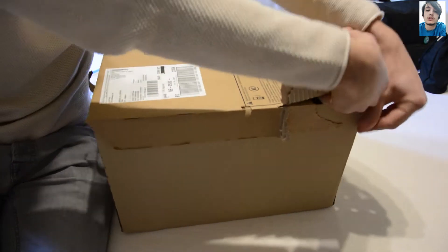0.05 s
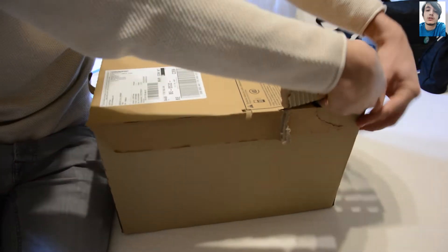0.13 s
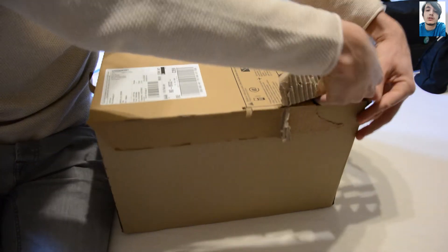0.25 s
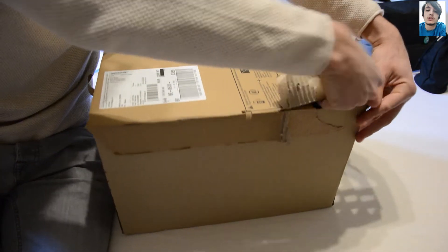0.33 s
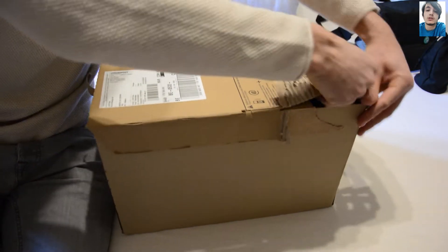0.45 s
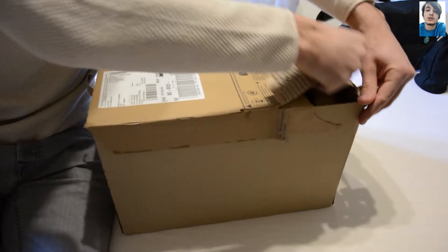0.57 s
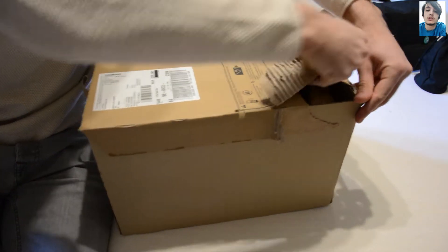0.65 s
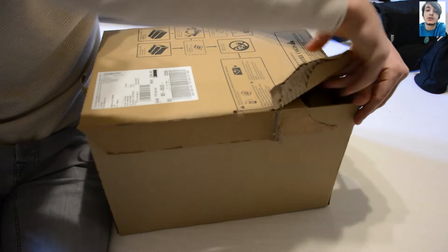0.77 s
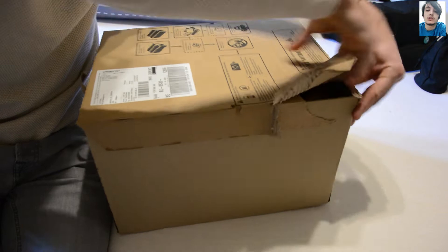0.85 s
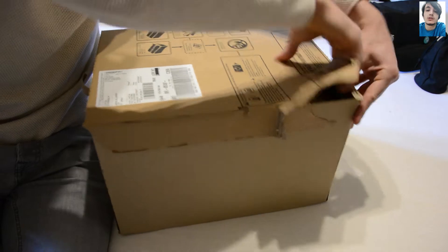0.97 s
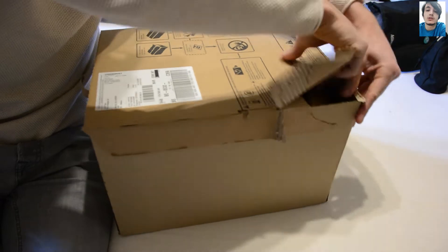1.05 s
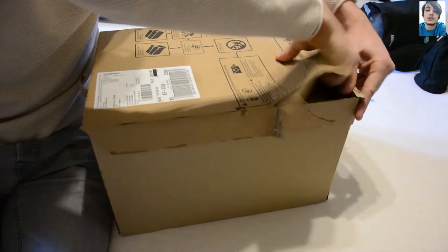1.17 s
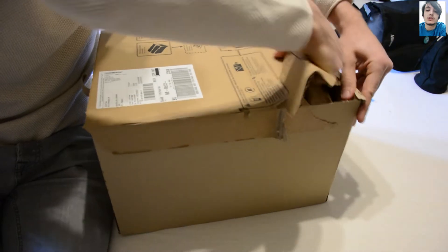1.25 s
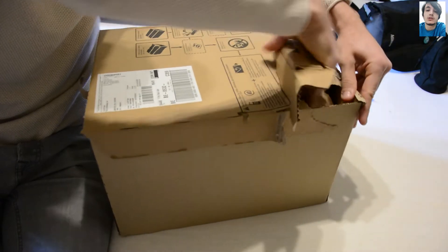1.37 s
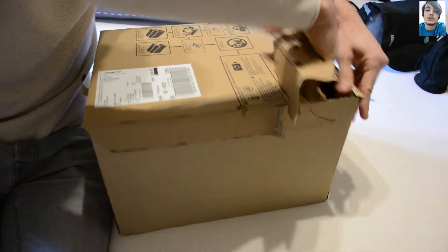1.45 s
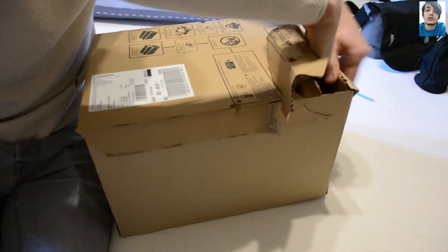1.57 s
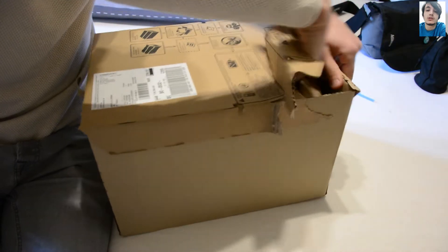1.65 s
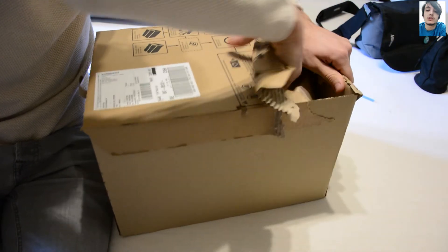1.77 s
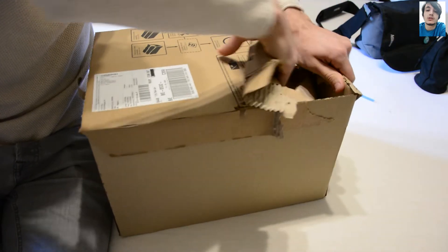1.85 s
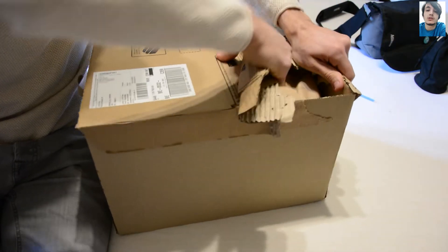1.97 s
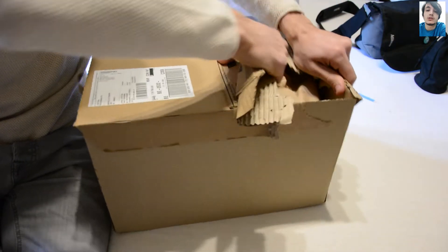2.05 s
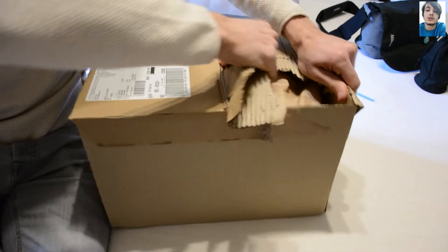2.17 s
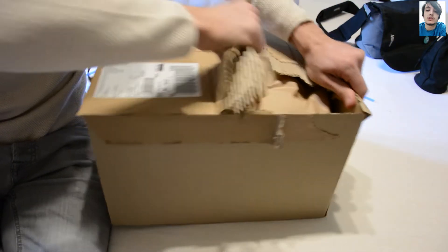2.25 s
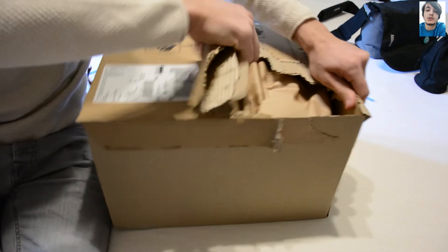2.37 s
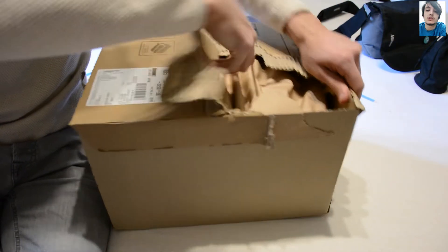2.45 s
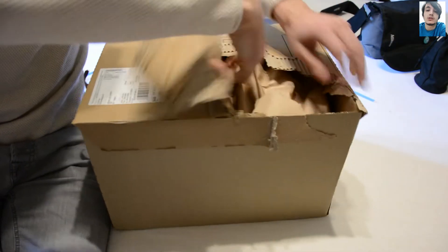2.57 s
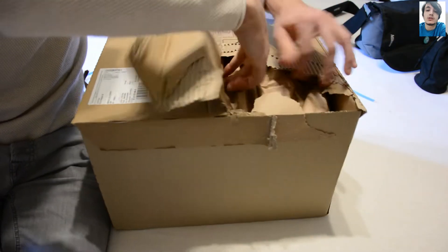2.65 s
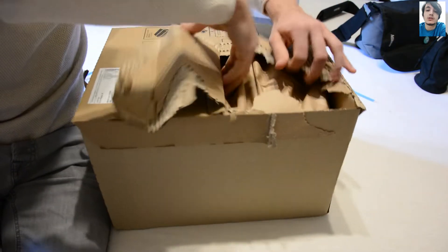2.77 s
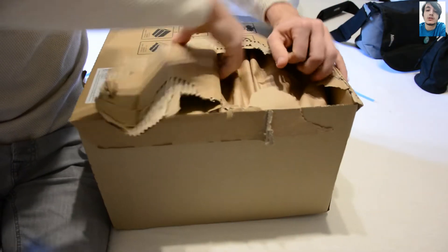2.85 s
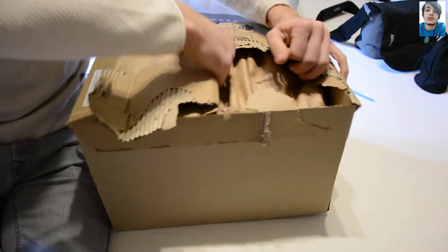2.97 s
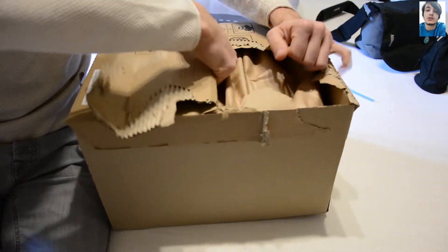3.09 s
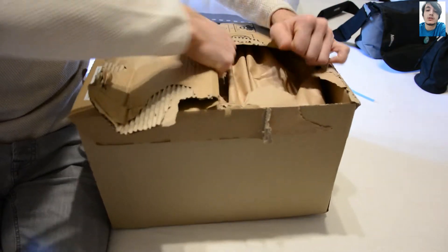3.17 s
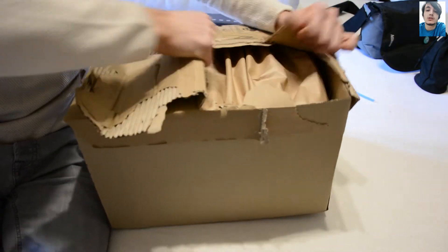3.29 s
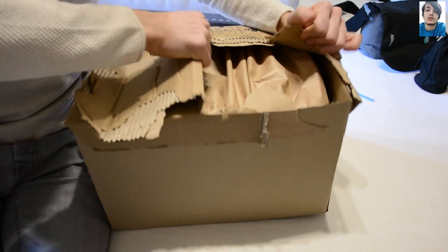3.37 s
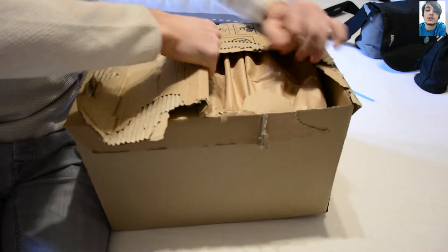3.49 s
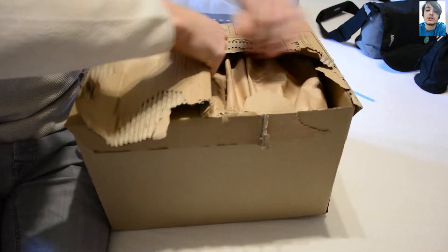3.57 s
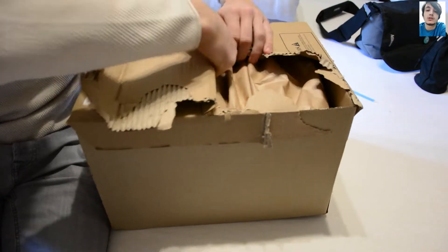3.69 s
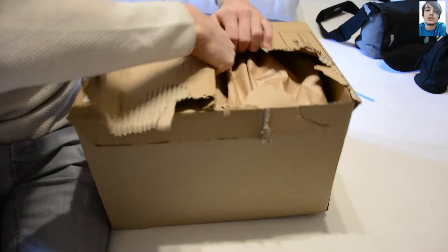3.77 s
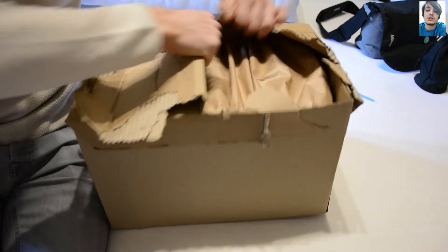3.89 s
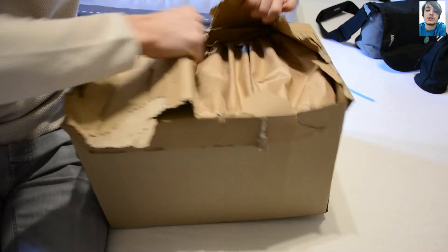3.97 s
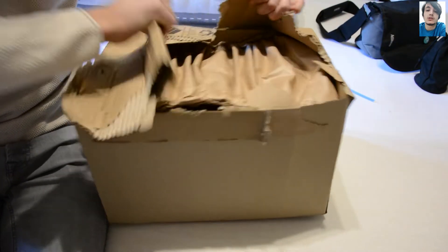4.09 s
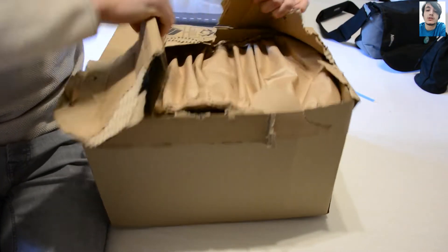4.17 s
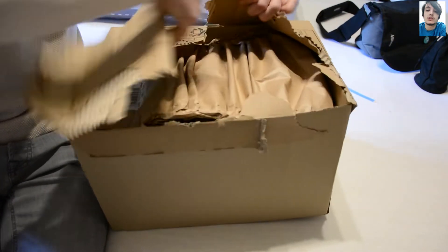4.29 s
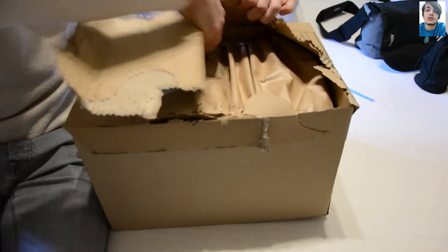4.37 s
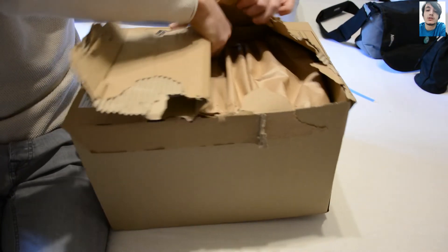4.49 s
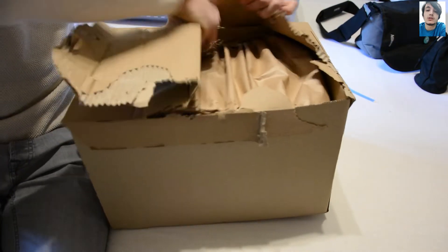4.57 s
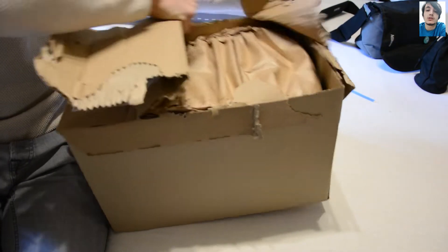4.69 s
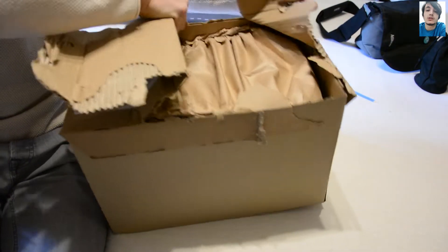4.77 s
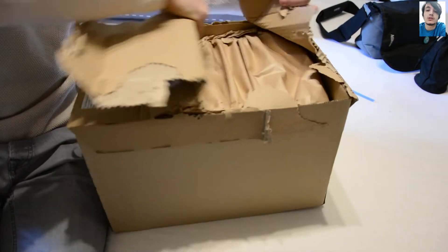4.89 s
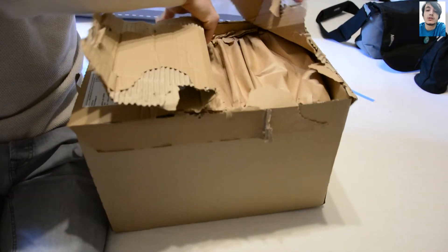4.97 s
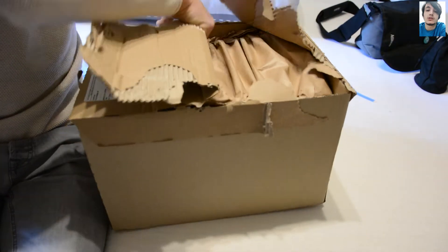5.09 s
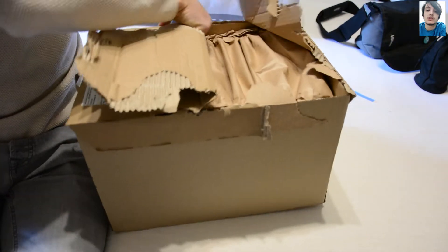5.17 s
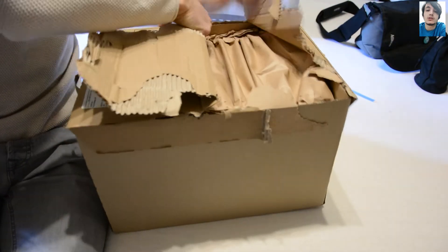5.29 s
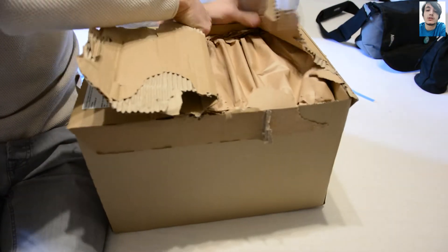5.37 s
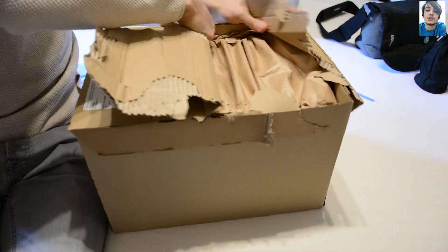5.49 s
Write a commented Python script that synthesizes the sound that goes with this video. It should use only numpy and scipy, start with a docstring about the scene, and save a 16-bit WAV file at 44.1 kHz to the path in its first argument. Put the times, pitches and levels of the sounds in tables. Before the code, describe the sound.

Hands tear open a corrugated cardboard box, heard close up in a small room with a short echo and a faint low rumble. For the first second there are only light crackles, scrapes and small snaps. A first real rip comes from about 1.1 to 1.4 seconds, dry and rasping, with hollow knocks from the box walls. After some softer crackling, a louder tear runs from 2.0 to 2.3 seconds and ends with a thump. Quieter picking and ticking follow, then a quick run of sharp snaps and ripping at 3.1 to 3.4 seconds. A crack at 3.8 leads into the loudest rip and a hollow thump around 4.0 to 4.2 seconds. The hardest peaks distort slightly. A shorter, lower crunch comes at 4.6 seconds, and soft crackling with small bumps continues until about 5.6 seconds.

```python
"""Ripping open a cardboard box

Hands tear open a corrugated cardboard box on a table in a small room. Fibres break in dense bursts,
and the glued flutes (the wavy ridges inside the board) let go with single snaps.
The hollow box booms and thumps. The loudest rips overload the recorder."""
import sys
import numpy as np
from scipy import signal
from scipy.fft import rfft, irfft, next_fast_len
from scipy.io import wavfile
from scipy.ndimage import map_coordinates

SR = 44100
rng = np.random.default_rng(int(sys.argv[2]) if len(sys.argv) > 2 else 0)


def log_audio(samples):
    """Write samples as a 16-bit WAV file to the path given in sys.argv[1]."""
    # one column per channel
    frames = np.atleast_2d(samples).T
    # limit to full scale, then quantise
    limited = np.clip(frames, -1, 1)
    pcm = np.round(limited * 32767).astype(np.int16)
    wavfile.write(sys.argv[1], SR, pcm)


N = 244490
STRONG_RIP_DB = -20


def amp(db):
    """Turn decibels into a gain."""
    return 10 ** (np.asarray(db) / 20)


def unit(x):
    """Scale x to an average power of 1."""
    return x / np.sqrt(np.mean(x ** 2) + 1e-20)


def along(points, hz):
    """Read between (Hz, value) points on a logarithmic frequency scale."""
    freqs, values = np.transpose(points)
    return np.interp(np.log(hz + 1), np.log(freqs + 1), values)


def filtered(x, response):
    """Multiply each frequency in x by response(hz)."""
    size = next_fast_len(N + SR // 2)
    return irfft(rfft(x, size) * response(np.fft.rfftfreq(size, 1 / SR)), size)[..., :N]


def causal(points):
    """A filter through (Hz, dB) points that rings only after its cause (minimum phase)."""
    def response(hz):
        cepstrum = irfft(np.log(amp(along(points, hz)) + 1e-6))
        half = len(cepstrum) // 2
        return np.exp(rfft(np.r_[cepstrum[0], 2 * cepstrum[1:half], np.zeros(half)]))
    return response


def room_tone():
    """The quiet room: a steady low rumble with faint hiss."""
    # The room's noise. Each row: frequency in Hz, relative level in dB.
    air = [(12, -24), (20, 13.5), (134, 6.5), (198, 0), (377, -6), (558, -6.5), (2140, -12), (10500, -23),
           (16000, -31)]
    return amp(-45) * unit(filtered(rng.standard_normal(N), lambda hz: amp(along(air, hz))))


def room_echo(x):
    """Each frequency dies at its own speed; hands move, so the echoes change five times a second."""
    # The room's ring. Each row: frequency in Hz, seconds to fade by 60 dB.
    fade_times = [(100, 0.27), (300, 0.13), (1000, 0.26), (4000, 0.21), (12000, 0.19)]
    out, step = np.zeros(N + 2 * SR), SR // 5
    for start in range(0, N, step):
        hz, t, noise = signal.stft(rng.standard_normal(SR // 2), SR, nperseg=256)
        fade = amp(-60 * t / along(fade_times, hz)[:, None])
        tail = signal.istft(noise * fade, SR, nperseg=256)[1]
        tail *= 1 - np.exp(-np.arange(len(tail)) / (0.0021 * SR))  # echoes take time to build up
        echo = signal.fftconvolve(x[start:start + step], tail / np.linalg.norm(tail))
        out[start:][:len(echo)] += echo
    return out[:N]


def hollow_box(hz):
    """How the hollow box rings at each frequency, with the deep bass turned down."""
    # Resonances of the walls and the air inside. Each row: pitch in Hz, width in Hz, gain in dB.
    modes = [(57.6, 37, -5.5), (129, 50, -2.5), (169.6, 44, -5), (243.9, 14, -0.5), (325.2, 43, -5),
             (419.3, 76, -6.5), (694, 280, -16.5)]
    ring = sum((-1) ** k * amp(db) * 1j * hz * width / (pitch ** 2 - hz ** 2 + 1j * hz * width)
               for k, (pitch, width, db) in enumerate(modes))
    return ring * (1j * hz / (70 + 1j * hz)) ** 2


def thumps():
    """A wall buckles and swings at its own pitch; the blow also rings the whole box."""
    # Pushes on the walls. Each row: start in seconds, level in dB, pitch in Hz, seconds to fade by 60 dB.
    pushes = [(0.278, -26.5, 121.3, 0.071), (0.373, -23.5, 126, 0.031), (0.467, -28, 340, 0.016),
              (0.602, -12.5, 246, 0.04), (0.884, -17, 124, .036), (0.963, -25, 104, .056),
              (1.075, -19, 317, .059), (1.204, -16.5, 121, .11), (1.259, -12.5, 257.7, 0.071),
              (1.282, -8, 235, 0.1), (1.396, -11, 233.7, 0.014), (1.43, -22, 196, 0.035),
              (1.492, -14.5, 312, 0.02), (1.681, -10.5, 195, .029), (1.715, -18, 375, .04),
              (1.816, -18.5, 370, 0.025), (1.853, -23, 385, 0.053), (1.991, -8, 272, 0.012),
              (2.058, -14, 244, .032), (2.091, -17, 454, .042), (2.11, -10, 288, 0.033),
              (2.211, -2, 237.6, 0.12), (2.231, 5, 298, 0.014), (2.239, -13, 270, .05),
              (2.289, -12.5, 237, 0.044), (2.523, -19.5, 120, 0.04), (2.628, -12.5, 162, 0.058),
              (2.637, -19, 234.5, 0.21), (2.958, -16, 415, 0.022), (3.034, -22.5, 368, 0.026),
              (3.136, -3, 278, 0.019), (3.175, -12, 265, .04), (3.201, -10.5, 268, .03),
              (3.243, -5.5, 263, 0.023), (3.272, -10.5, 277, 0.023), (3.291, -12, 70, 0.055),
              (3.3, -6, 260, 0.029), (3.346, -12.5, 288, .036), (3.823, -1, 291, .011),
              (4.014, -2, 255, .033), (4.052, 5.5, 293, 0.037), (4.085, 12, 314, 0.03),
              (4.101, -23, 133.8, .073), (4.128, -9, 279, 0.033), (4.357, -26.5, 81.6, 0.059),
              (4.604, -10.5, 324, 0.011), (4.627, -9, 392, 0.061), (4.64, 4.5, 397, 0.019),
              (4.929, -17.5, 304, 0.021), (5.103, -15.5, 162, .021), (5.165, -8.5, 140, 0.024),
              (5.17, -17.5, 75, .054), (5.395, -13, 116, 0.055), (5.399, -22, 75, 0.095),
              (5.487, -20.5, 129, 0.035)]
    swing, blows, t = np.zeros(N + SR), np.zeros(N), np.arange(SR // 4) / SR
    for start, db, hz, fade_s in pushes:
        side = rng.choice([-1, 1])  # the wall jumps in or out
        envelope = amp(db - 60 * t / fade_s) * (1 - np.exp(-t / 0.0004))
        swing[round(start * SR):][:len(t)] += side * envelope * np.sin(2 * np.pi * hz * t)
        blows[round(start * SR)] = side * amp(db + 29.5)
    return swing[:N] + filtered(blows, hollow_box)


def pull():
    """Loudness curves in dB for ripping, bending board and fine fibres; overlapping tugs add up."""
    # Tugs on the flaps. Each row: time of full strength in seconds, ripping level in dB, rise, hold
    # and fall in seconds, then bending and fine fibres in dB relative to the ripping.
    tugs = [(0.028, -38, 0.14, 0.0022, 0.072, 7, -3.5), (0.197, -38.5, 0.016, 0.017, .057, -4, -2.5),
            (0.275, -43, 0.091, 0.0016, 0.099, -1, -13), (0.468, -44.5, 0.009, 0.013, 0.04, -1, -2.5),
            (0.548, -39, .012, 0.076, 0.048, -11, 3), (0.606, -35, .06, 0.0019, .19, 2, 2.5),
            (0.883, -35.5, 0.079, 0.0015, .08, 5.5, 4), (1.073, -25.5, 0.052, 0.0018, .13, 0, -0.5),
            (1.186, -31.5, .03, .015, .05, 1, 0), (1.21, -19.5, 0.013, .02, 0.11, -3, -5.5),
            (1.265, -25, 0.13, 0.052, 0.079, 2.5, 1), (1.449, -34, 0.18, 0.0018, 0.14, 1, -3.5),
            (1.71, -32.5, .107, .002, 0.12, 6, -0.5), (1.828, -38, 0.061, 0.0022, 0.59, 0.5, -1.5),
            (1.888, -45, 0.042, 0.0086, .05, -4.5, 1), (1.958, -32.5, 0.019, 0.078, 0.12, -6, 3),
            (2.07, -22.5, 0.031, 0.051, 0.089, 5.5, 4), (2.218, -13, 0.027, .002, 0.12, 3.2, 2),
            (2.288, -22.5, 0.092, 0.0022, 0.04, -9, 3.5), (2.449, -40, 0.033, 0.13, .15, -5, -10.5),
            (2.477, -30.5, 0.045, 0.0037, 0.028, -3.5, 0), (2.638, -40, 0.16, .002, 0.11, 4, -12),
            (2.784, -37.5, 0.12, 0.0018, 0.42, -2.5, -5.5), (2.976, -32, 0.19, 0.09, .2, -6, -7.5),
            (3.203, -29, 0.0102, .02, 0.11, 1, -12), (3.286, -15.5, .1, 0.0037, 0.11, 3.5, 2.5),
            (3.44, -40, 0.082, 0.099, 0.037, -4, -16), (3.675, -39, 0.013, .002, 0.333, 1, -0.5),
            (3.832, -26.5, 0.021, .002, 0.079, -0.5, -9.5), (3.97, -31.5, 0.26, .002, .1, -1.5, -1.5),
            (4.02, -20, 0.0077, 0.012, 0.13, 12.5, -2), (4.056, -12.5, 0.058, 0.001, 0.14, 1.5, -0.5),
            (4.412, -37.5, 0.09, 0.16, 0.19, 0, 0), (4.637, -22, 0.021, 0.0028, 0.15, 2.5, -7),
            (4.915, -33.5, 0.12, 0.0024, 0.3, -5, -4.5), (5.174, -34.5, 0.31, .002, 0.087, 1, 0),
            (5.262, -39.5, .015, 0.034, 0.22, -11, -3), (5.39, -41, 0.17, 0.037, 0.11, -1, -8),
            (5.53, -45.5, .2, .02, .2, -5, -5)]
    # Factors on the swing below, one each for ripping, bending and fine fibres.
    steepness = [0.97, 1, 1.045]
    swing_db = 20  # roughly how far a tug climbs in its rise and drops in its fall
    t, power = np.arange(0, N / SR + .002, .001), 1e-9
    for at, db, rise, hold, fall, bend_db, fine_db in tugs:
        away = np.maximum(at - t, 0) / rise + np.maximum(t - at - hold, 0) / fall
        levels_db = db - swing_db * away * np.c_[steepness] + np.c_[[0, bend_db, fine_db]]
        power = power + amp(levels_db) ** 2
    return [np.interp(np.arange(N) / SR, t, 10 * np.log10(layer)) for layer in power]


def wobble(per_s):
    """A smooth curve through per_s random values a second."""
    return map_coordinates(rng.standard_normal(N // 100), [np.arange(N) * per_s / SR])


def breaks(per_s, spread_db, life_s, hiss):
    """Breaking fibres: short random noise bursts, mostly small and a few large, on an even hiss."""
    starts = rng.random(N) < per_s / SR
    sizes = amp(spread_db * np.minimum(rng.exponential(size=N), 4))
    bursts = signal.lfilter([1], [1, -np.exp(-1 / (life_s * SR))], starts * sizes)
    return unit((unit(bursts) + hiss) * rng.standard_normal(N))


def tiny_cracks(count, centre_hz, octaves, cycles, spread_db):
    """Tiny cracks at random moments, each ringing for a few cycles at its own pitch."""
    when, chance = np.hsplit(rng.random((count, 2)), 2)
    hz = centre_hz * 2 ** (octaves * rng.standard_normal((count, 1)))
    sizes = amp(spread_db * np.minimum(-np.log(chance), 4))
    age = np.arange(160)
    turns = hz * age / SR
    pings = sizes * np.exp(-turns / cycles) * np.sin(2 * np.pi * turns)
    places = (when * N).astype(int) + age
    return unit(np.bincount(places.ravel(), pings.ravel(), N + len(age))[:N])


def ripping():
    """Breaking fibres sound in the flutes, the board and its paper skin, and shake the box walls."""
    # The tone of tearing flutes, bending board and fine fibres.
    # Each row: frequency in Hz, relative level in dB.
    flute_tone = [(700, -46.5), (1400, 4), (2000, 6.5), (3000, -2), (4500, -0.5), (7000, -33),
                  (14000, -48.5)]
    board_tone = [(250, -24), (500, -4.5), (800, -4.5), (1400, -8.5), (2200, -18.5), (5000, -53)]
    fine_tone = [(2060, -8.5), (3500, -5), (5260, -3.5), (6240, -7), (10300, -9), (15000, -21.5),
                 (16000, -45)]
    rip_db, bend_db, fine_db = pull()
    wall_db = STRONG_RIP_DB - 3 + 0.87 * (rip_db - STRONG_RIP_DB)  # walls follow the pull less steeply
    fibres = breaks(per_s=520, spread_db=3, life_s=0.0026, hiss=0.38)
    paper = breaks(per_s=1100, spread_db=9, life_s=0.00058, hiss=1.3)  # the skin also cracks by itself
    jerks = amp(1.12 * wobble(per_s=40))  # the tear runs unevenly
    cracks = tiny_cracks(count=2500, centre_hz=2480, octaves=0.596, cycles=3.2, spread_db=1)
    flutes = amp(rip_db - 3) * unit(unit(filtered(fibres, causal(flute_tone))) + 1.37 * cracks)
    creases = tiny_cracks(count=900, centre_hz=870, octaves=0.4, cycles=2, spread_db=4.5)
    board = amp(bend_db - 3.7) * unit(unit(filtered(fibres, causal(board_tone))) + 0.84 * creases)
    fine = amp(fine_db - 2) * unit(filtered(0.42 * fibres + paper, causal(fine_tone)))
    shaking = breaks(per_s=90, spread_db=0, life_s=0.0021, hiss=1)
    walls = amp(wall_db) * unit(filtered(shaking, hollow_box))
    return jerks * (flutes + board + fine + walls)


def small_snaps():
    """Rows for the random small snaps inside a rip: the harder the pull, the more there are."""
    tries_per_s, strong_rip_per_s = 400, 60
    count = round(tries_per_s * N / SR)
    when, chance = rng.random((count, 2)).T
    level_spread, pitch_spread, life_spread = rng.standard_normal((count, 3)).T
    rip_db = pull()[0][(when * N).astype(int)]
    db = rip_db + 8.5 + 3.5 * level_spread
    hz = 1930 * 2 ** (.25 * pitch_spread)
    life_s = 0.0086 * 2 ** (.6 * life_spread)
    octaves, edge_db = np.full(count, 2.54), np.full(count, -10)
    happens = chance * tries_per_s < strong_rip_per_s * amp((rip_db - STRONG_RIP_DB) / 2)
    return list(np.c_[when * N / SR, db, hz, octaves, edge_db, life_s][happens])


def snaps():
    """Each flute lets go with a short crack around its own pitch, topped by a brighter edge."""
    # Flutes letting go. Each row: start in seconds, level in dB, pitch in Hz, width in octaves,
    # milliseconds to fade by 18 dB.
    flute_snaps = [(0.267, -23, 2120, .93, 15), (0.366, -29, 1250, 1.4, 4.9),
                   (0.45, -31.5, 3440, 0.73, 4.3), (0.598, -15.5, 1740, 2.8, 5.6),
                   (0.63, -21, 1630, 3.6, 3.6), (0.889, -16.5, 2090, 1.7, 5.9), (1.013, -24, 1460, 3.1, 9),
                   (1.036, -21, 1630, 1.5, 5), (1.047, -24, 1740, 3, 6.2), (1.062, -19, 3860, .9, 5.6),
                   (1.072, -5.5, 2070, 2.5, 14), (1.08, -12, 2040, 2, 6.6), (1.187, -14, 1540, 1.53, 8),
                   (1.208, -9, 2450, 2.2, 25), (1.222, -2, 2780, 2, 2), (1.227, -4, 1494, 2, 14),
                   (1.254, 4, 1900, 4.5, 6), (1.272, -4, 1720, 2.1, 2), (1.683, -15, 1210, 2, 8.3),
                   (1.709, -6, 1620, 1.4, 4.4), (1.716, -19, 1140, 1.5, 3.3), (1.816, -9, 1320, 0.92, 5.7),
                   (1.907, -18, 7130, 1.6, 1.4), (1.955, -3, 2520, 2.9, 2.7), (1.997, -8.5, 2590, 2.7, 7.3),
                   (2.056, 6.5, 1840, 2.7, 4.3), (2.076, -4.5, 1930, 1.2, 5.1), (2.091, -4, 1860, 2.3, 15),
                   (2.098, 0.5, 1830, 1.9, 3.5), (2.111, 2, 1260, 2.7, 6.8), (2.191, -10, 2436, 1.04, 3.5),
                   (2.202, -4.5, 1639, 3.6, 23), (2.21, 8.5, 1573, 1.75, 6.5), (2.226, -3, 2150, 0.55, 12),
                   (2.296, -2.5, 1730, 2.6, 14), (2.48, -15.5, 2610, 1.45, 6.5), (2.528, -20, 1120, 1.2, 4),
                   (2.627, -18, 1130, 0.44, 9), (2.652, -26, 3780, 1.1, 5), (2.742, -18, 1360, 2.6, 6.9),
                   (2.769, -18.5, 2090, 2.8, 15), (2.787, -16.5, 2340, 3, 5.8),
                   (2.863, -23, 2600, 1.5, 3.2), (2.874, -15, 2350, 1, 6.2), (2.953, -11, 2480, 2, 5.4),
                   (2.984, -20, 2770, 1.4, 9.6), (3.033, -19, 3500, .8, 3.3),
                   (3.053, -13.5, 2430, 0.99, 3.4), (3.136, -4.5, 1100, 2.2, 2.4),
                   (3.164, -8, 2330, 1.6, 3.7), (3.198, 6.5, 2080, 2.2, 3.2), (3.241, 4.5, 3050, 1.2, 4),
                   (3.26, 5.5, 2130, .85, 7.1), (3.271, 1, 1930, 2.4, 7), (3.285, 7, 1900, 1.3, 11.5),
                   (3.299, -5, 1670, 0.73, 8.7), (3.35, -5.5, 2020, 1.9, 8.2), (3.473, -12, 2560, 1.6, 2.9),
                   (3.823, -2, 796, 2.3, 4), (3.917, -11.5, 1930, 2.7, 8.1), (3.95, -21, 1460, 1.3, 6),
                   (3.998, -16, 1640, 0.9, 8.3), (4.012, 7.5, 2140, 2.5, 5.4), (4.042, 9.5, 1600, 3.4, 8.2),
                   (4.053, 6, 1880, 3.3, 2.9), (4.081, 9, 2046, 3.35, 2.4), (4.088, 4, 1430, 1.2, 3.9),
                   (4.401, -15.5, 4000, 1.6, 5.6), (4.468, -20.5, 1660, 1.5, 4.8),
                   (4.497, -20, 2600, 0.48, 1.8), (4.53, -20.5, 3460, 3.7, 3), (4.543, -19, 2450, 1.9, 9.7),
                   (4.603, -8, 2040, 1.35, 6.9), (4.627, 2, 1040, 1.95, 3.9), (4.637, -3, 890, 1.05, 12),
                   (4.65, -8, 940, 0.85, 3.7), (4.661, -8, 1080, 1.1, 7), (5.101, -19.5, 1830, 2, 27),
                   (5.135, -17, 1200, 1.7, 2.3), (5.161, -18, 2030, 2.7, 14), (5.187, -18, 1990, 1.7, 3.5),
                   (5.258, -23, 4200, 0.84, 4), (5.27, -20, 3230, 0.5, 7.6),
                   (5.389, -24.5, 2340, 0.56, 2.5), (5.409, -20.5, 2730, 1.1, 3),
                   (5.417, -21, 2290, 0.88, 2.6), (5.427, -20.5, 2600, 0.56, 4.8),
                   (5.53, -18.5, 3300, 1.5, 2.5)]
    # Loud snaps and low snaps have a smaller share of bright edge.
    listed = [(start, db, hz, octaves, -18 - 0.21 * db + 0.5 * np.log2(hz / 2000), ms / 1000)
              for start, db, hz, octaves, ms in flute_snaps]
    out, t = np.zeros(N + SR), np.arange(1024) / SR
    treble = signal.butter(1, [4000, 11000], "band", fs=SR)
    for start, db, hz, octaves, edge_db, life_s in listed + small_snaps():
        body_noise, edge_noise = rng.standard_normal((2, len(t)))
        half_width = 2 ** (octaves / 2)
        band = signal.butter(2, [hz / half_width, min(hz * half_width, 18000)], "band", fs=SR)
        attack = 1 - np.exp(-t / (0.052 * life_s))  # long snaps start softer
        envelope = attack * amp(-18 * (t / life_s) ** 1.12)
        jolt = 3 * amp(-60 * t / .0008)  # the glue gives way at once
        body = signal.lfilter(*band, body_noise * envelope + jolt)
        edge = signal.lfilter(*treble, edge_noise) * envelope ** 2.1
        snap = body / abs(body).max() + amp(edge_db) * edge / abs(edge).max()
        out[round(start * SR):][:len(t)] += amp(db) * snap
    return out[:N]


def scene():
    """The tearing box and its echo over the quiet room, in one channel."""
    hits, rips = snaps() + thumps(), ripping()
    background = room_tone()
    cardboard = hits + rips + amp(-6) * room_echo(hits) + amp(-10) * room_echo(rips)
    # Remove the steady offset and deepest rumble from the tearing sound.
    cardboard = filtered(cardboard, lambda hz: 1j * hz / (60 + 1j * hz))
    return (cardboard + background)[None]


def record(dry):
    """Overload flattens the loudest peaks, and the highest treble is cut off."""
    flattened = dry / (1 + abs(dry / .99) ** 12) ** (1 / 12)
    return filtered(flattened, lambda hz: hz < 15900)


dry = scene()
out = record(dry)
log_audio(out)
```